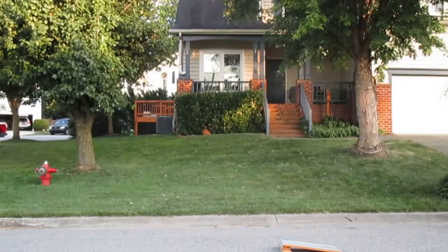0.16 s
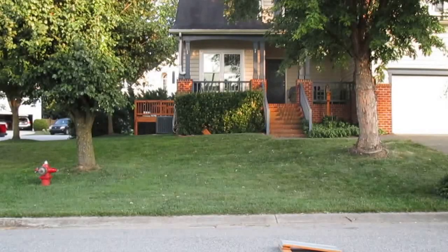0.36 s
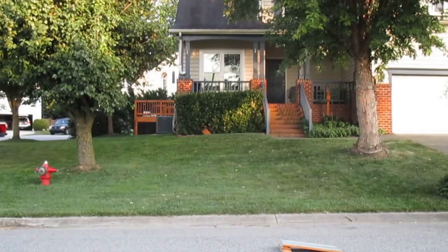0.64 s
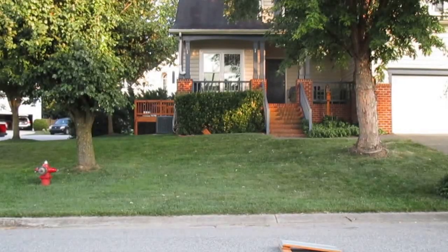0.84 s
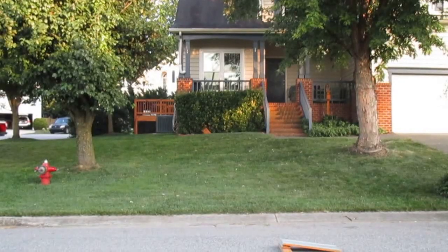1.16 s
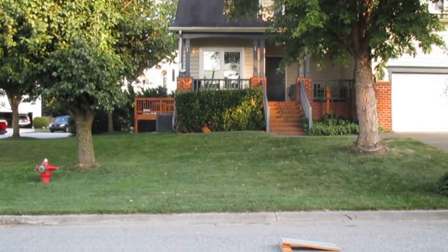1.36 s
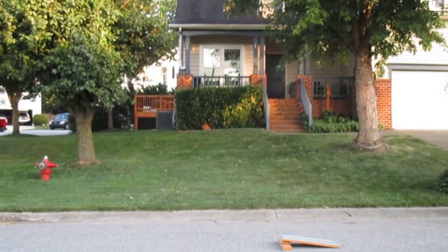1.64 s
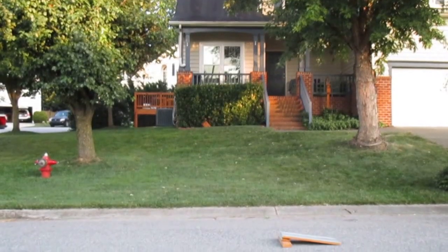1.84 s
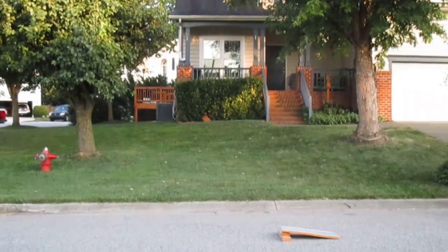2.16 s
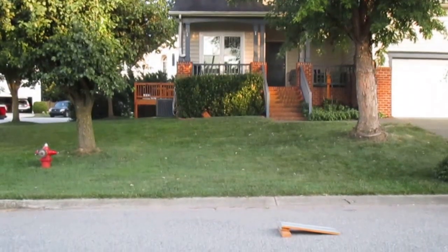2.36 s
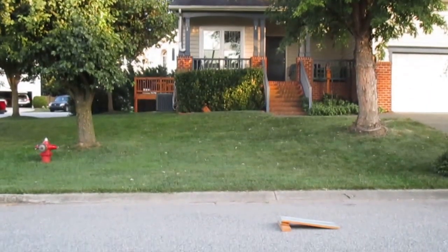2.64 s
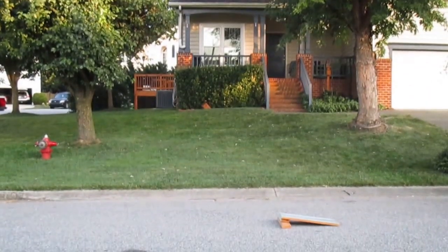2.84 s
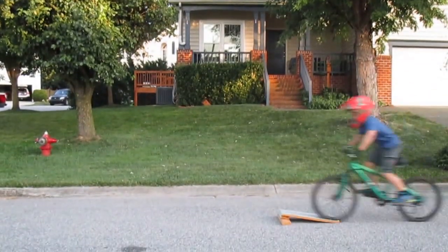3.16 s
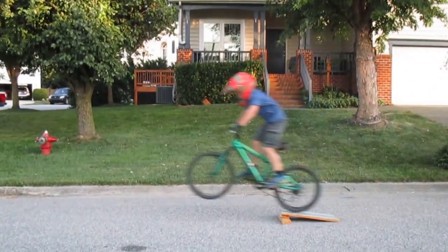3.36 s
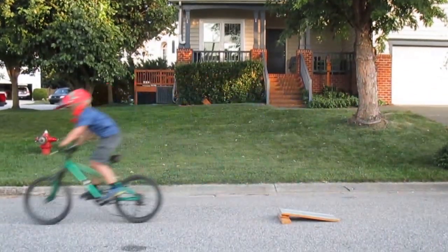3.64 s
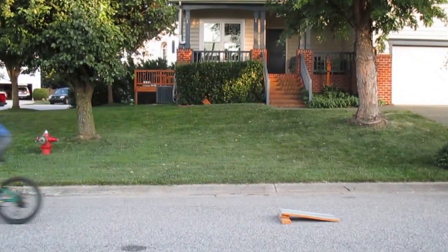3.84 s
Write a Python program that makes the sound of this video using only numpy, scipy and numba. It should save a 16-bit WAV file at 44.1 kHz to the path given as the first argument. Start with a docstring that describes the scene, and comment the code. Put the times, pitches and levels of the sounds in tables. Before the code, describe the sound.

A bicycle rolls up, thumps over a wooden ramp and lands with a rattle.

```python
"""A quiet street between gardens: a child's bicycle coasts up, freewheel ticking, and takes a small
wooden ramp. Each wheel thumps the board, the board slaps the road, and the bicycle lands with a
rattle of chain and frame. Behind it a songbird whistles and insects rasp over a bed of distant
traffic and low hum. House fronts scatter the sound."""
import sys
import numpy as np
from scipy import signal
from scipy.fft import rfft, irfft
from scipy.io import wavfile
from scipy.ndimage import uniform_filter1d
from numba import njit

SR = 44100
rng = np.random.default_rng(int(sys.argv[2]) if len(sys.argv) > 2 else 0)


def inscribe(sig):
    """Save sig as 16-bit PCM at rate SR to the path in sys.argv[1].

    A 1-D sig is mono; a 2-D sig holds one channel per row.
    Samples are clipped to [-1, 1] before scaling.
    """
    pcm = np.round(np.clip(np.atleast_2d(sig).T, -1, 1) * 32767)
    wavfile.write(sys.argv[1], SR, pcm.astype(np.int16))


N = 176400
T = np.arange(N) / SR

# metallic tone of rattles and clicks (frequency [Hz], relative gain [dB])
METAL_EQ = [(300, 8.5), (1500, 13.5), (3000, 7), (5700, 4), (7500, 0), (11000, -3.5), (13000, -13),
            (16000, -37)]
# bright tone of pawl ticks and grit (frequency [Hz], relative gain [dB])
TICK_EQ = [(3500, -12), (5300, 6), (7500, 2), (10200, 3.5), (12000, -1), (14000, -6), (16000, -15)]


def undb(db):
    """Decibels to gain."""
    return 10 ** (np.asarray(db) / 20)


def unit(x):
    """Scale to rms 1."""
    return x / np.sqrt(np.mean(x ** 2))


def curve(rows, column=1):
    """One column of a table, joined by straight lines in time."""
    rows = np.array(rows)
    return np.interp(T, rows[:, 0], rows[:, column])


def during(rows):
    """Gate, open between the first and last time of a table."""
    return (T > rows[0][0]) & (T < rows[-1][0])


def convolve(x, response):
    """Play x through an impulse response, cut to the scene's length."""
    return signal.oaconvolve(x, response)[:N]


def colour(x, eq, size=8192):
    """Minimum-phase EQ with the given (Hz, dB) shape and unit power gain."""
    hz, db = np.array(eq).T
    bins_hz = np.arange(size + 1) * SR / (2 * size)
    gain = unit(undb(np.interp(np.log(bins_hz + 1), np.log(hz), db)))
    cepstrum = irfft(np.log(gain))
    cepstrum[1:size] *= 2
    cepstrum[size + 1:] = 0
    return convolve(x, irfft(np.exp(rfft(cepstrum)))[:size])


def noise():
    """White noise."""
    return rng.standard_normal(N)


def band(hz, width_hz):
    """Noise in one narrow resonance."""
    bins_hz = np.arange(N // 2 + 1) * SR / N
    return unit(irfft(rfft(noise()) / (1 + ((bins_hz - hz) / width_hz) ** 2), N))


def tone(hz):
    """Sine that follows a pitch curve."""
    return np.sin(2 * np.pi * np.cumsum(hz) / SR)


def wander(rate_hz):
    """Smooth random drift, spread near 1."""
    step = int(SR / rate_hz)
    return np.sqrt(2) * uniform_filter1d(np.repeat(noise()[:N // step + 1], step), step)[:N]


def bursts(rows):
    """Noise that jumps up and dies away for each (time [s], level [dB], decay [s])."""
    power, t = np.zeros(N), T[:SR // 4]
    for start, db, decay in rows:
        part = power[int(start * SR):][:len(t)]
        part += (undb(db) * np.exp(-t[:len(part)] / decay)) ** 2
    return noise() * np.sqrt(power)


def ringing(modes):
    """Response of a body to one tap; neighbouring modes swing opposite ways."""
    t = T[:SR // 4]
    return sum((-1) ** k * undb(db) * np.sin(2 * np.pi * hz * t) * np.exp(-np.log(1000) * t / t60)
               for k, (hz, db, t60) in enumerate(modes))


def contact(start, soft_ms):
    """Force of one contact, of unit area; softer lasts longer and sounds duller."""
    age = np.maximum(T - start, 0) * 1000 / soft_ms
    force = age * np.exp(-np.minimum(age, 60))
    return force / force.sum()


def street(hum_hz=75.9):
    """Distant traffic rumble and a low wavering hum that swells and recedes."""
    # tone of the traffic bed (frequency [Hz], relative gain [dB])
    traffic_eq = [(25, -12), (48, 2.5), (81, -2), (160, -5.5), (235, -6), (320, -14), (450, -15.5),
                  (887, -14), (1210, -22), (3480, -37), (5750, -41), (7600, -43.5), (12200, -50),
                  (15700, -61)]
    # swell of the hum (time [s], level [dB])
    hum_swell = [(.2, -42.5), (2.0, -38), (4.0, -43)]
    hum = band(hum_hz, width_hz=3.5) + undb(-10) * band(2 * hum_hz, width_hz=4.4)
    return undb(-36.5) * colour(noise(), traffic_eq) + hum * undb(curve(hum_swell))


def insects(rasp_hz=7130, rasp_s=0.048, whine_hz=11820):
    """Pulsing rasps over a faint chorus, and a thin steady whine."""
    # one insect's rasps (peak time [s], level [dB])
    rasps = [(.47, -62), (.7, -62), (.92, -63), (1.35, -62), (1.59, -64), (1.85, -64), (2.43, -61)]
    pulses = sum(undb(db) * np.exp(-((T - peak) / rasp_s) ** 2) for peak, db in rasps)
    whine = undb(-72.5) * tone(whine_hz + 2 * wander(20))
    return (undb(-69.5) + pulses) * band(rasp_hz, width_hz=200) + whine


def tyres(grit_per_s=420, whirr_peak_s=2.7, whirr_spread_s=0.36):
    """Tread rolls, hisses and crackles on asphalt, growing as it nears; the roll dips in the jump."""
    # rolling noise (time [s], level [dB])
    roll_level = [(.3, -59.5), (1.5, -46), (2.2, -41.5), (2.6, -40), (2.8, -34.5), (3.0, -39), (3.17, -34),
                  (3.4, -26), (3.5, -42.5), (3.66, -59), (3.73, -31.5), (3.85, -41), (4.0, -42.5)]
    # body of the roll (frequency [Hz], relative gain [dB])
    roll_eq = [(60, 0), (250, -5), (480, 2), (800, -1), (1400, -9.5), (1900, -11.5), (3100, -23),
               (7000, -34), (11000, -40), (16000, -45)]
    # fine hiss of the tread (time [s], level [dB])
    hiss_level = [(1.5, -58.5), (2.3, -52.5), (2.75, -48.5), (3.0, -61), (3.5, -61)]
    # tone of the hiss (frequency [Hz], relative gain [dB])
    hiss_eq = [(900, -25), (1900, 2.5), (2500, -1.5), (3100, -14), (5800, -22), (6800, -8.5), (7800, -13.5),
               (9000, -17), (16000, -30)]
    # thin tones of the spinning wheels on the run-up (frequency [Hz], width [Hz], peak level [dB])
    wheel_tones = [(1820, 60, -49.5), (3460, 5.9, -65)]
    rough_road = unit(noise() * undb(2.53 * wander(400)))
    roll = colour(rough_road * undb(curve(roll_level)), roll_eq)
    grains = unit(noise() * (rng.random(N) < grit_per_s / SR))
    approach = undb(curve(hiss_level) + 2 * wander(25.2))
    grit = undb(-9) * colour(grains * approach, TICK_EQ)
    whirr = sum(undb(db) * band(hz, width) for hz, width, db in wheel_tones)
    whirr *= np.exp(-((T - whirr_peak_s) / whirr_spread_s) ** 2)
    hiss = colour(noise() * approach, hiss_eq)
    return roll + grit + whirr + hiss


def knocks(click_decay_s=0.002):
    """Small hollow knocks, each with a sharp click on top."""
    # light hits (time [s], knock level [dB], click level [dB])
    hits = [(.359, -31, -58), (.681, -30.5, -54), (1.004, -31, -41), (1.321, -30.5, -69.5),
            (1.855, -27, -39), (1.937, -26, -37.5), (2.628, -29.5, -31), (2.869, -25.5, -29.5)]
    # hollow ring of a knock (frequency [Hz], relative level [dB], t60 [s])
    hollow_modes = [(842, -1, 0.025), (1407, -4.5, 0.03), (1500, -16, 0.033), (1970, -7, 0.0074)]
    taps = np.zeros(N)
    for start, db, _ in hits:
        taps[int(start * SR)] = undb(db)
    clicks = bursts([(start, db, click_decay_s) for start, _, db in hits])
    return convolve(taps, ringing(hollow_modes)) + colour(clicks, METAL_EQ)


def bird(floor_hz=2470, bend=2.4, attack_s=0.011, fall_s=0.043):
    """A slurred whistle, then runs of pure notes that hold and swoop down."""
    # opening slur (time [s], pitch [Hz], level [dB])
    whistle = [(.54, 4400, -66), (.553, 4430, -46), (.566, 3820, -42), (.578, 3750, -41), (.598, 3980, -49),
               (.612, 4020, -61)]
    # notes (start of fall [s], hold before it [s], pitch at fall [Hz], rise in hold [Hz], level [dB])
    notes = [(.709, 0.037, 4720, -520, -41), (.825, 0.022, 4600, 400.5, -43.5),
             (.935, 0.023, 4390, 149.5, -45), (1.052, .022, 4150, 0, -47), (2.029, .0066, 4880, 0, -43),
             (2.115, 0.0061, 4600, -1, -44.5), (2.199, .006, 4620, -0.5, -44.5),
             (2.284, .0093, 4410, -0.5, -46.5), (2.377, .006, 4450, 0.5, -50.5),
             (3.844, .0068, 4460, 0, -43), (3.928, .011, 4550, 0, -45.5)]
    song = during(whistle) * undb(curve(whistle, column=2)) * tone(curve(whistle))
    for fall_start, hold, top_hz, rise_hz, db in notes:
        age = T - fall_start + hold
        held = np.clip(age / hold, 0, 1)
        fallen = np.clip((T - fall_start) / fall_s, 0, 1)
        pitch = floor_hz + (top_hz - floor_hz) * np.exp(-bend * fallen) - rise_hz * (1 - held ** 2)
        envelope = np.clip(age / attack_s, 0, 1) * held ** 0.41 * (1 - fallen ** 1.1)
        song += undb(db) * envelope * tone(uniform_filter1d(pitch, size=200))
    return song


def freewheel(tick_decay_s=0.0013):
    """The pawl drops over each tooth with a bright tick."""
    # ticking of the coasting hub (time [s], rate [ticks/s], level [dB])
    coasting = [(1.7, 52, -54), (2.4, 65, -57), (2.75, 71, -54), (2.95, 61, -51.5), (3.1, 61, -46),
                (3.22, 90, -43), (3.48, 58, -41), (3.6, 59, -44.5), (3.8, 67, -40), (4.0, 95, -43)]
    rate = curve(coasting) * (1 + 0.06 * wander(30))
    teeth_passed = np.cumsum(rate) / SR
    since_tick = (teeth_passed % 1) / rate
    level = undb(curve(coasting, column=2) + 2 * wander(50)) * during(coasting)
    return colour(noise() * np.exp(-since_tick / tick_decay_s) * level, TICK_EQ)


def ramp(rear_wheel_s=3.29, low_cut_hz=175):
    """Each wheel thumps the wood and rings its own mix of modes; the tread drums on it in between."""
    # blows on the board (time [s], relative level [dB], contact softness [ms])
    blows = [(3.1814, 3, 0.39), (3.1866, -0.2, 0.2), (3.1891, 2, 0.75), (3.2203, -11.5, 0.13),
             (3.237, -6, 0.4), (3.3025, -1.5, 0.63), (3.3233, 13, 0.38), (3.3249, 0, 0.25),
             (3.3411, -4.5, 0.014), (3.3481, -1.5, 0.21)]
    # wood modes (frequency [Hz], front-wheel weight [dB], rear-wheel weight [dB], t60 [s])
    modes = [(92, -15, -41, .06), (221, -17.5, -19.5, 0.072), (398, -17, -8, 0.032), (466, 0.5, -3, 0.042),
             (573, -4.5, -6.5, 0.039), (650, -5.5, -8, 0.064), (671, -0.5, -6, 0.053), (716, 0, 2.1, 0.035),
             (944, -10.5, -6.5, 0.064), (1080, -9.5, -1.5, 0.03), (1204, -4.5, 0, 0.022),
             (1602, -12, 1, .03), (2296, -4.5, -6.5, 0.02)]
    # tread drumming across the board (time [s], level [dB])
    drum_level = [(3.14, -42), (3.2, -26.5), (3.235, -27), (3.28, -40), (3.32, -24), (3.35, -23),
                  (3.38, -39), (3.43, -34.5), (3.5, -46)]
    # a small board radiates little bass
    low_cut = signal.butter(2, low_cut_hz, "high", fs=SR, output="sos")
    front = signal.sosfilt(low_cut, ringing([(hz, db, t60) for hz, db, _, t60 in modes]))
    rear = signal.sosfilt(low_cut, ringing([(hz, db, t60) for hz, _, db, t60 in modes]))
    force = sum(undb(db) * contact(start, soft_ms) for start, db, soft_ms in blows)
    thumps = convolve(force * (T < rear_wheel_s), front) + convolve(force * (T >= rear_wheel_s), rear)
    tread = convolve(noise(), contact(0, soft_ms=0.15)[:len(rear)])
    drumming = unit(convolve(tread, front + rear)) * undb(curve(drum_level)) * during(drum_level)
    return undb(-4) * thumps + drumming


def rattle():
    """Chain and frame chatter over the ramp and on landing."""
    # jolts (time [s], level [dB], decay [s])
    jolts = [(3.175, -33.5, 0.007), (3.257, -29, .003), (3.304, -31, 0.016), (3.308, -31, 0.015),
             (3.364, -29, .004), (3.631, -29, 0.0029), (3.667, -26.5, 0.0058), (3.7008, -19, 0.0053),
             (3.732, -27.5, 0.0045)]
    return colour(bursts(jolts), METAL_EQ)


def board_slap():
    """The board slaps down on the road with a hard midrange crack."""
    # wood hitting asphalt (time [s], level [dB], decay [s])
    slaps = [(3.3412, -6, 0.0038)]
    # tone of the crack (frequency [Hz], relative gain [dB])
    slap_eq = [(300, -68), (900, -20), (1300, 10.5), (1650, 9.5), (1950, -15), (2400, -4), (3300, -13.5),
               (4200, -15), (5200, -29), (16000, -52)]
    return colour(bursts(slaps), slap_eq)


def squeaks():
    """Brief, thin squeaks of metal on metal."""
    # rubs (time [s], length [s], pitch [Hz], level [dB])
    rubs = [(3.363, 0.011, 9600, -34), (3.658, 0.0085, 10750, -26.5), (3.662, 0.0093, 10100, -34)]
    return sum(undb(db) * np.sin(np.pi * np.clip((T - start) / length, 0, 1)) * band(hz, width_hz=400)
               for start, length, hz, db in rubs)


def landing():
    """The tyres come down on the road with dull thuds."""
    # touchdowns (time [s], level [dB], decay [s])
    touchdowns = [(3.612, -31.5, 0.037), (3.685, -21, 0.019), (3.702, -18, 0.015), (3.777, -31.5, 0.034)]
    # weight of the thud (frequency [Hz], relative gain [dB])
    thud_eq = [(40, -22), (150, 7), (350, -2.5), (720, 2.5), (1450, -3), (1780, -0.5), (2300, -13.5),
               (5000, -25.5), (16000, -32)]
    return colour(bursts(touchdowns), thud_eq)


def frame_clink(jolt_s=3.7008):
    """The hardest jolt, on landing, makes the frame ring briefly."""
    # ring of the frame (frequency [Hz], relative level [dB], t60 [s])
    modes = [(4250, -0.5, 0.046), (5830, -11, 0.035), (9000, -7, 0.041)]
    jolt = np.zeros(N)
    jolt[int(jolt_s * SR)] = undb(-23.5)
    return convolve(jolt, ringing(modes))


def echo(x, wet_db, t60, build_s):
    """Add scattered reflections from houses and trees, which build up and fade."""
    # bright tone of the tail (frequency [Hz], relative gain [dB])
    tail_eq = [(60, -38), (500, -13.5), (1500, -10.5), (4000, -4.5), (16000, -5)]
    envelope = np.clip(T / build_s, 0, 1) * np.exp(-np.log(1000) * T / t60)
    tail = unit(colour(noise() * envelope, tail_eq)) / np.sqrt(N)
    return x + undb(wet_db) * convolve(x, tail)


@njit
def follow(x, attack_s, release_s):
    """Envelope follower with separate rise and fall times."""
    out, level = np.empty(len(x)), 1e-6
    for i in range(len(x)):
        level += (x[i] - level) / (SR * (attack_s if x[i] > level else release_s))
        out[i] = level
    return out


def scene():
    """The mono mix, heard from the kerb."""
    wood = echo(ramp() + board_slap(), wet_db=-12, t60=0.66, build_s=0.025)
    bicycle = echo(landing() + rattle() + freewheel() + knocks(), wet_db=-8.5, t60=0.6, build_s=0.0025)
    song = echo(bird(), wet_db=-10.5, t60=0.45, build_s=0.08)
    return (wood + bicycle + song + frame_clink() + squeaks() + tyres() + insects() + street())[None]


def record(dry, silence_s=0.2044, threshold_db=-18, ratio=6, high_cut_hz=15700):
    """Open after a beat of silence; a compressor ducks after the blows, peaks clip, the top is cut."""
    x = dry[0] * np.clip((T - silence_s) / 0.008, 0, 1)
    level = follow(abs(x), attack_s=0.028, release_s=0.98)
    gain = np.minimum(1, undb(threshold_db) / level) ** (1 - 1 / ratio)
    high_cut = signal.ellip(10, 0.1, 90, high_cut_hz, fs=SR, output="sos")
    return signal.sosfilt(high_cut, np.clip(x * gain, -1, 1))[None]


dry = scene()
out = record(dry)
inscribe(out)
```